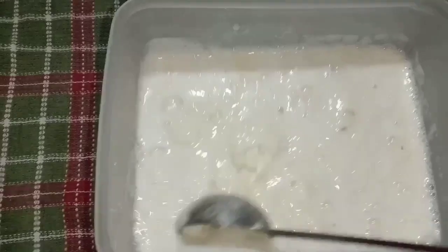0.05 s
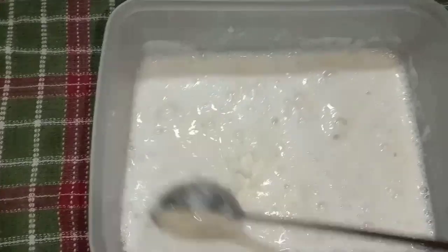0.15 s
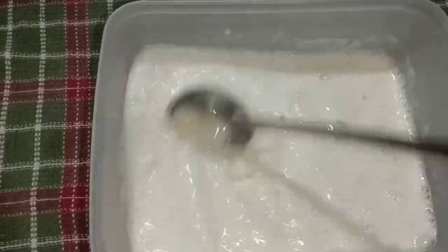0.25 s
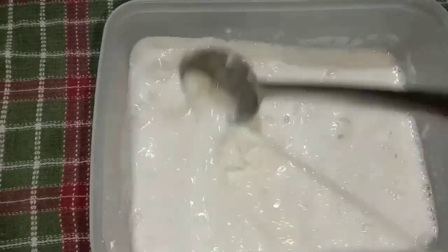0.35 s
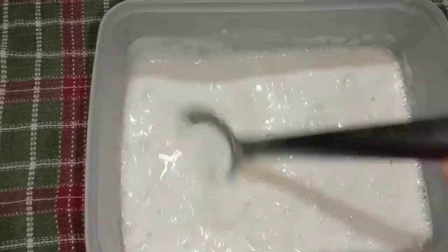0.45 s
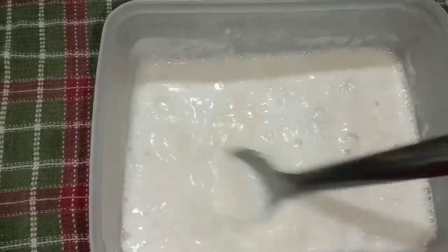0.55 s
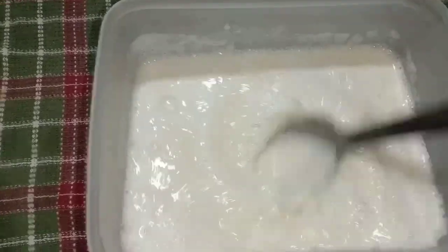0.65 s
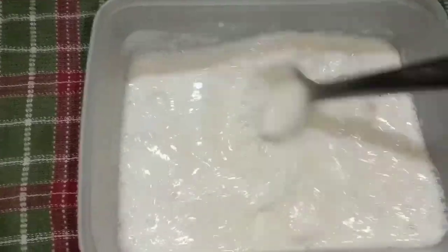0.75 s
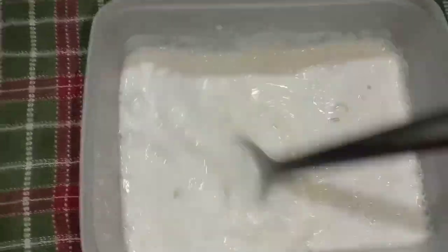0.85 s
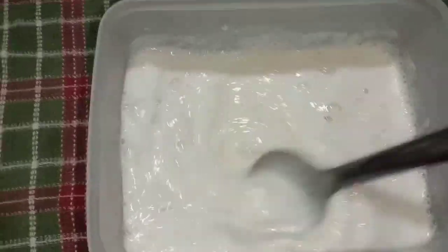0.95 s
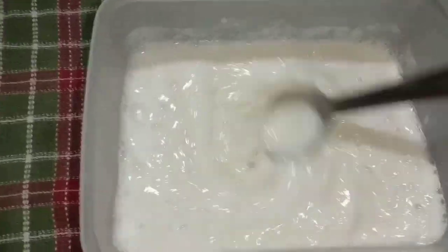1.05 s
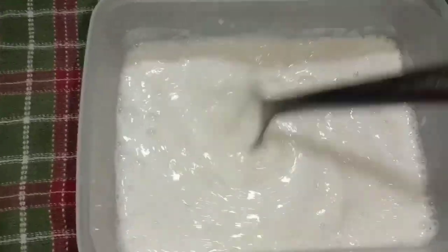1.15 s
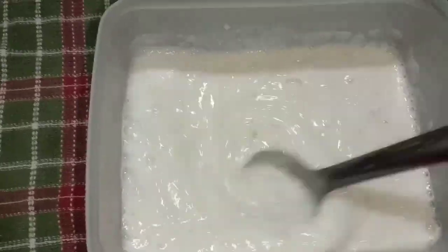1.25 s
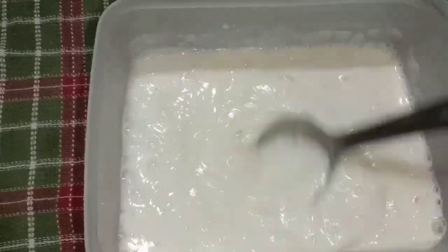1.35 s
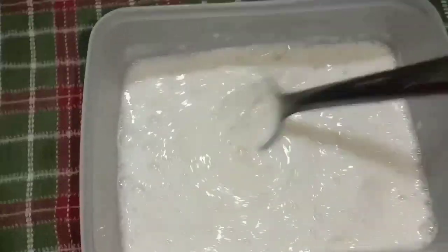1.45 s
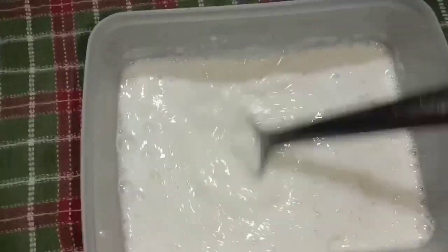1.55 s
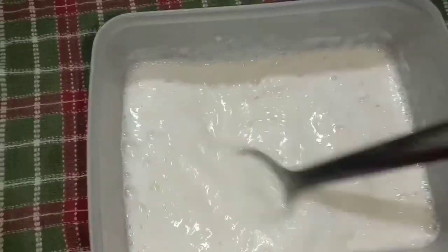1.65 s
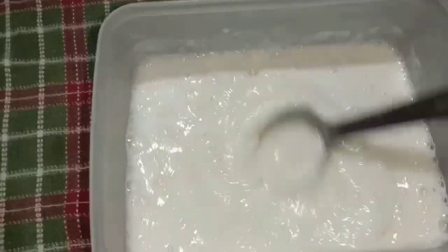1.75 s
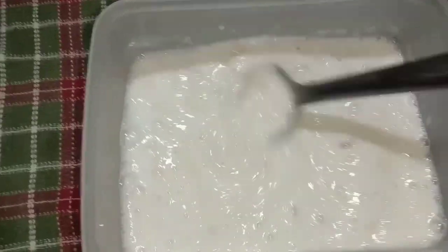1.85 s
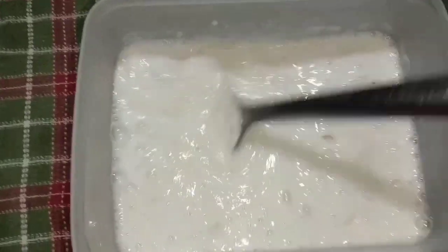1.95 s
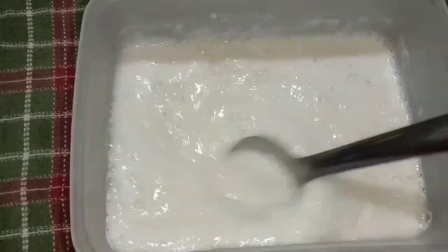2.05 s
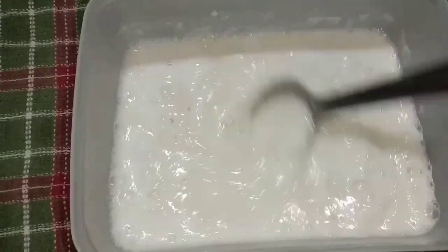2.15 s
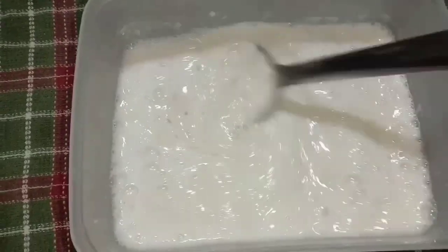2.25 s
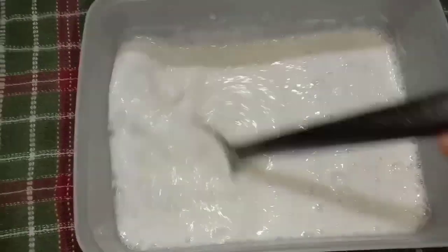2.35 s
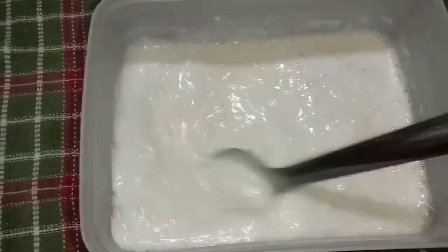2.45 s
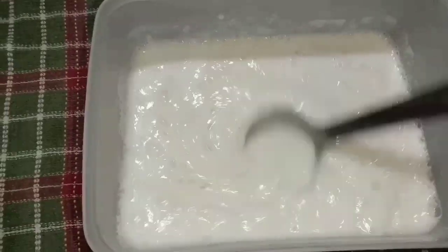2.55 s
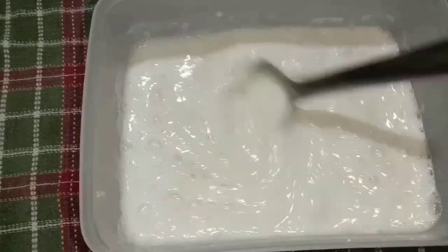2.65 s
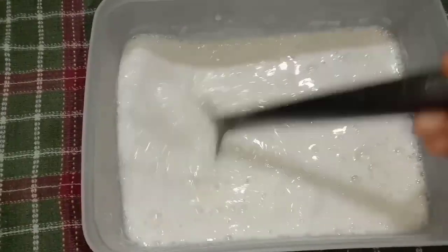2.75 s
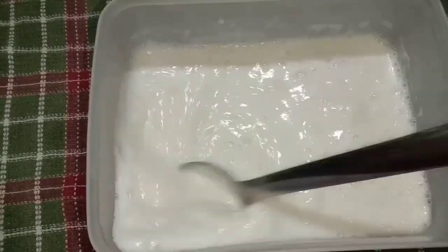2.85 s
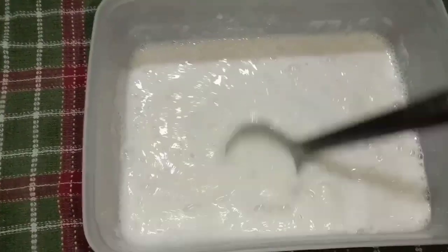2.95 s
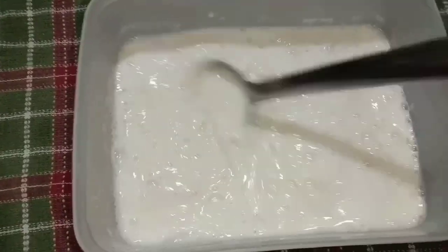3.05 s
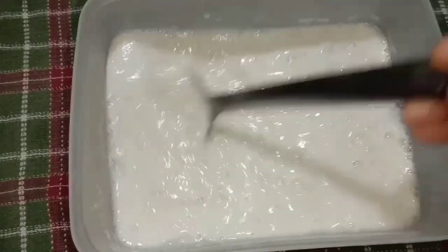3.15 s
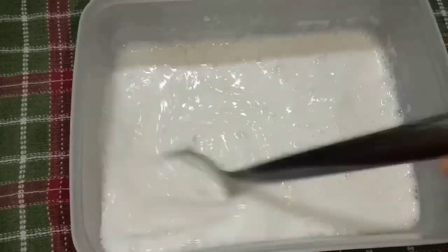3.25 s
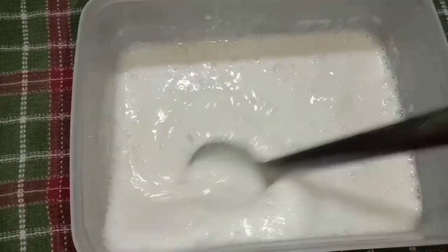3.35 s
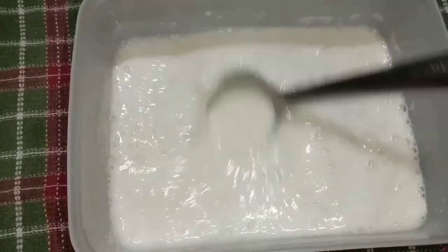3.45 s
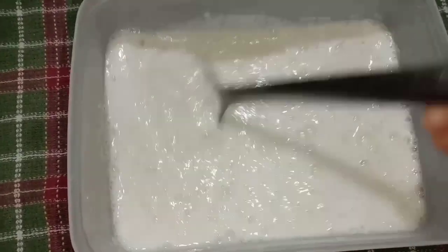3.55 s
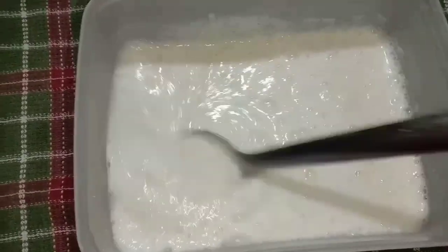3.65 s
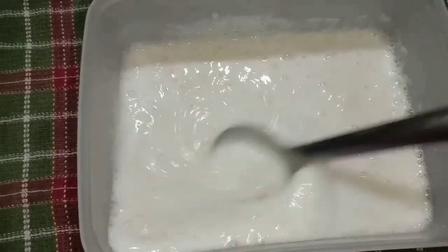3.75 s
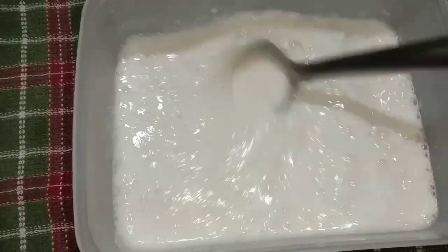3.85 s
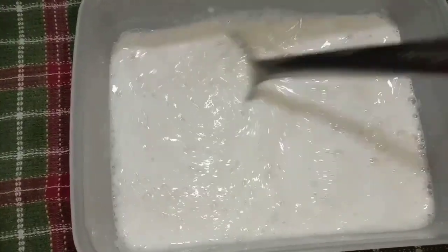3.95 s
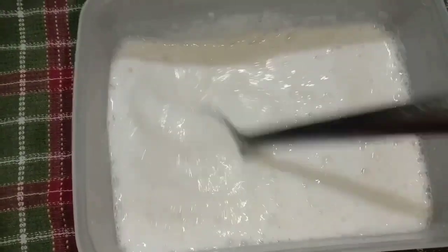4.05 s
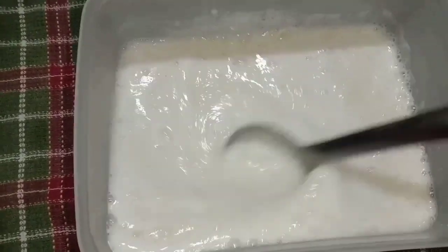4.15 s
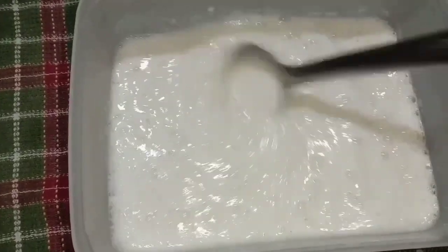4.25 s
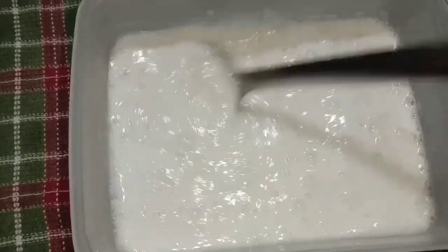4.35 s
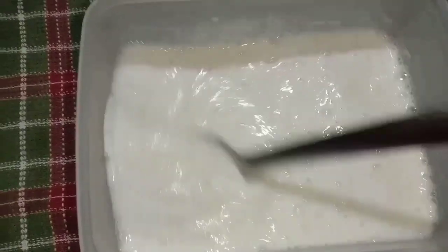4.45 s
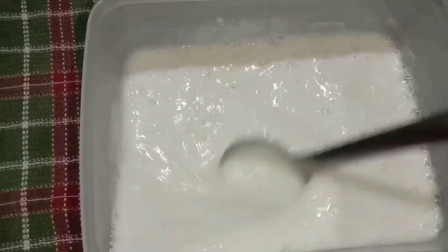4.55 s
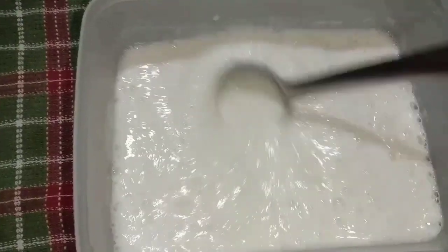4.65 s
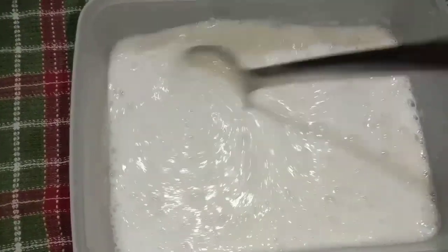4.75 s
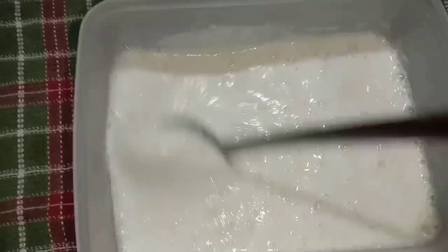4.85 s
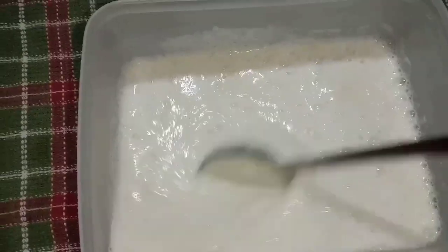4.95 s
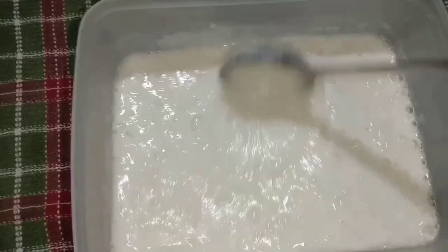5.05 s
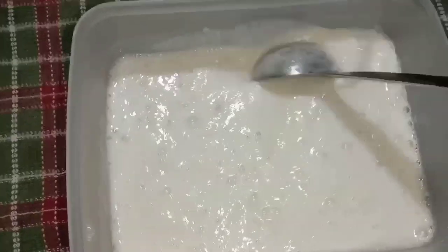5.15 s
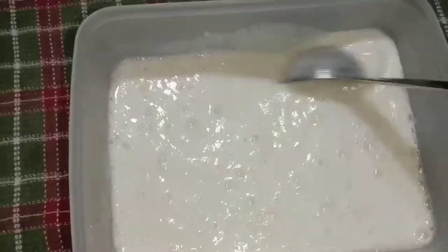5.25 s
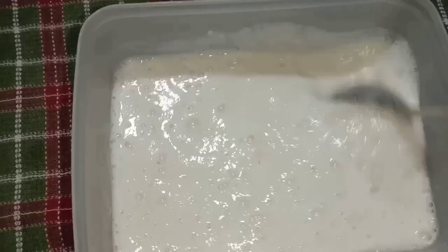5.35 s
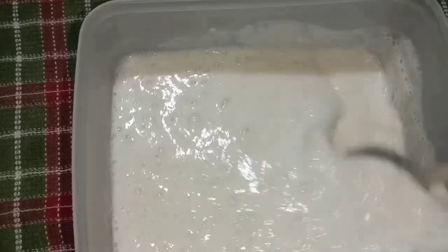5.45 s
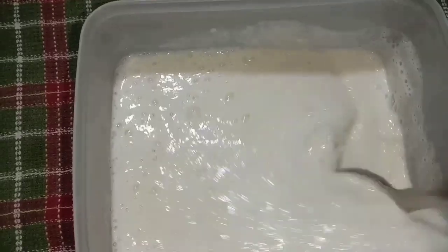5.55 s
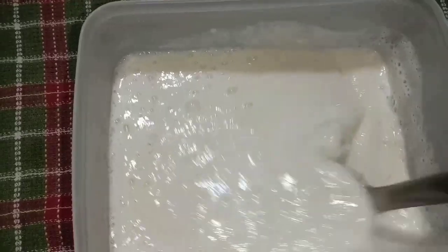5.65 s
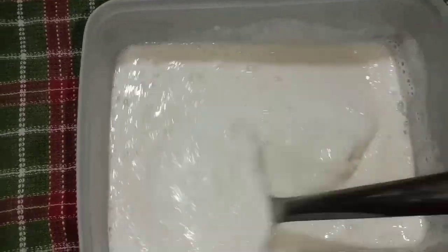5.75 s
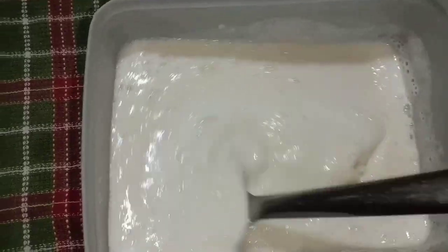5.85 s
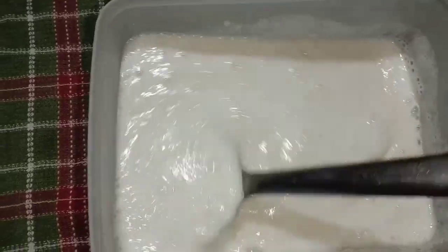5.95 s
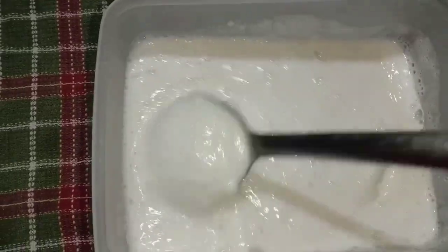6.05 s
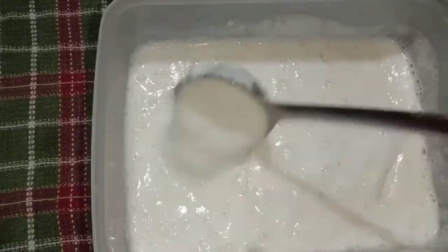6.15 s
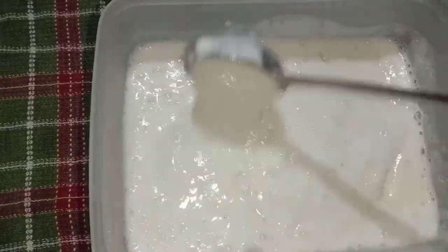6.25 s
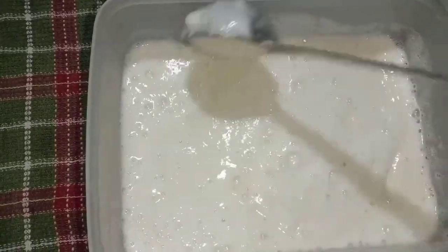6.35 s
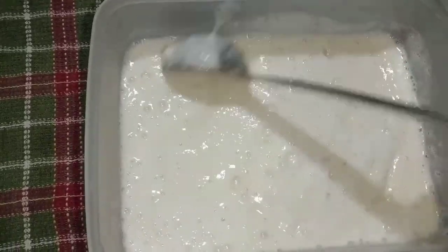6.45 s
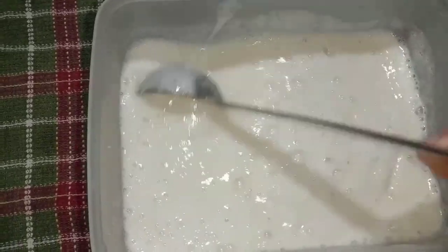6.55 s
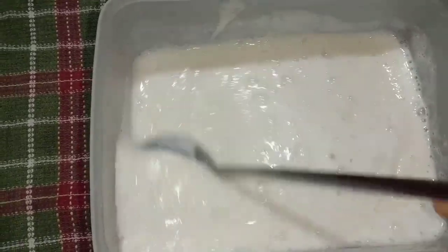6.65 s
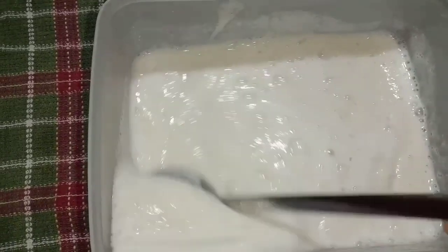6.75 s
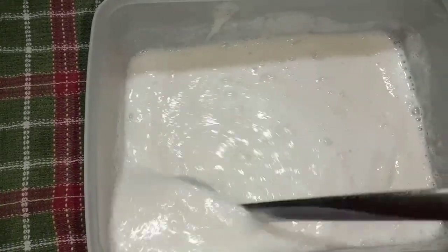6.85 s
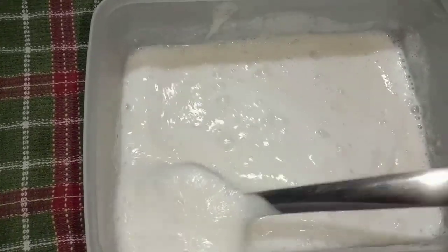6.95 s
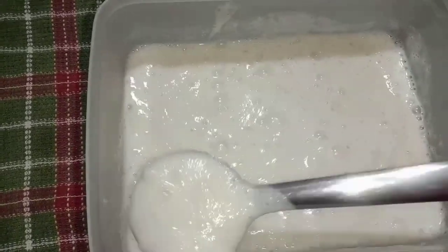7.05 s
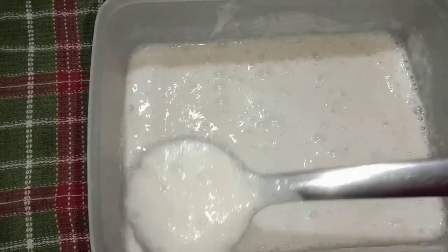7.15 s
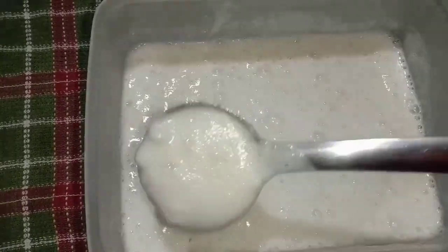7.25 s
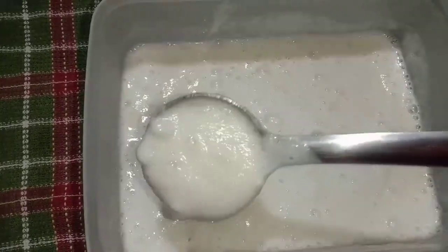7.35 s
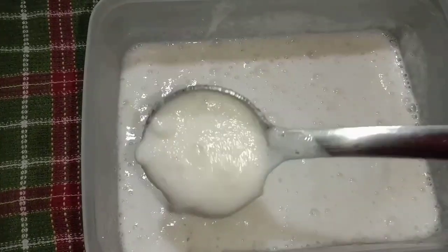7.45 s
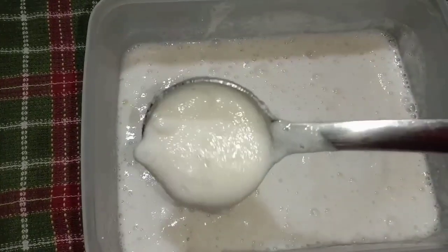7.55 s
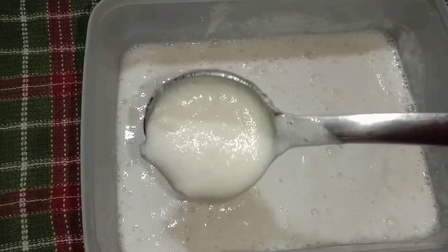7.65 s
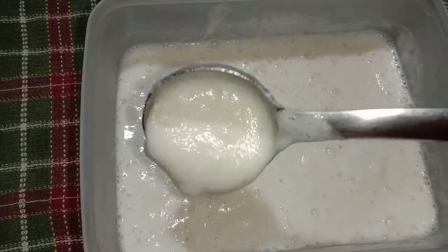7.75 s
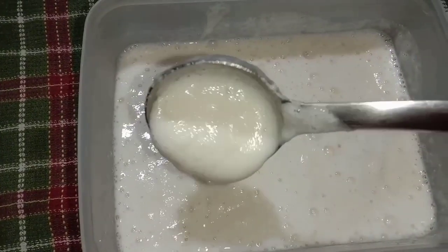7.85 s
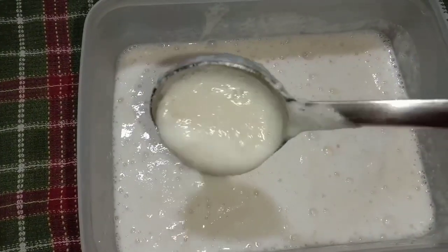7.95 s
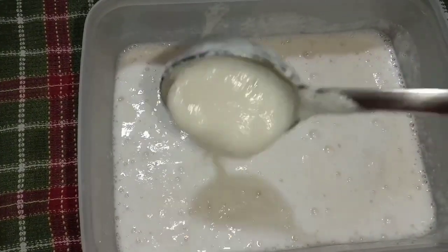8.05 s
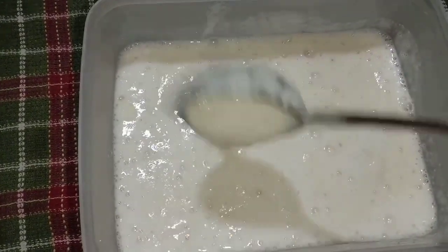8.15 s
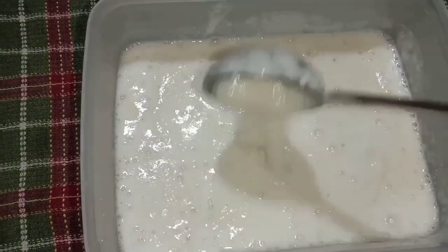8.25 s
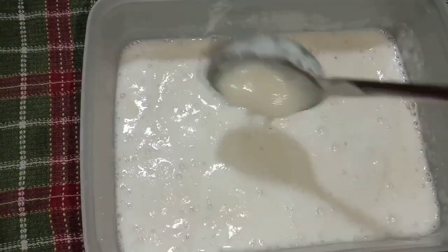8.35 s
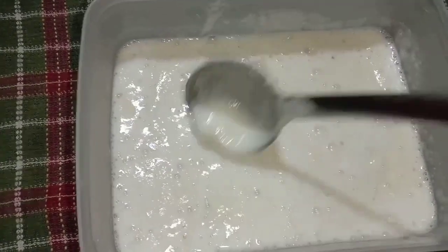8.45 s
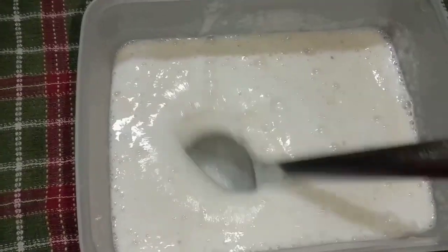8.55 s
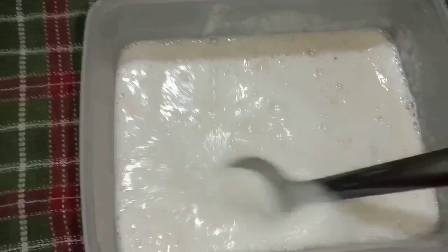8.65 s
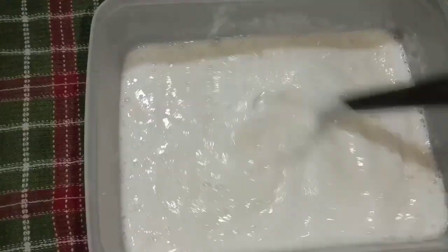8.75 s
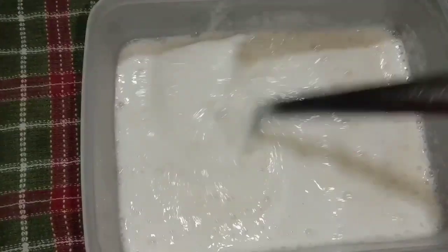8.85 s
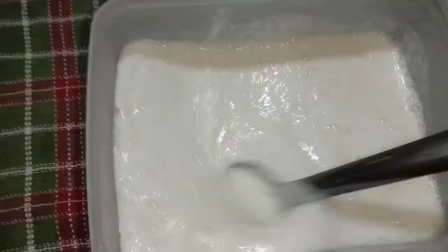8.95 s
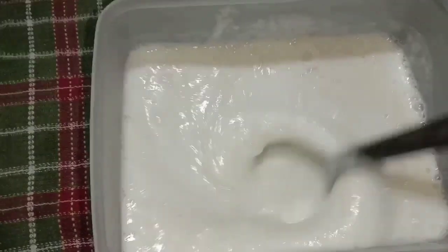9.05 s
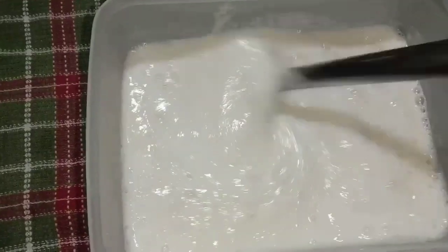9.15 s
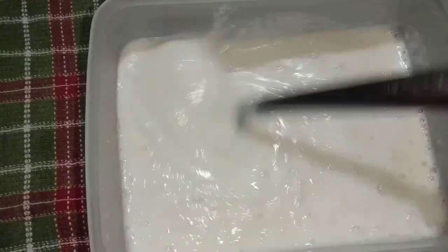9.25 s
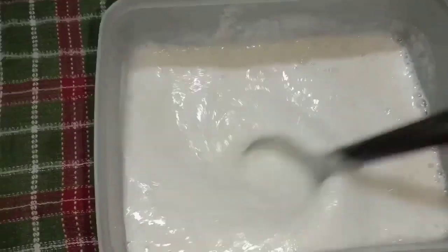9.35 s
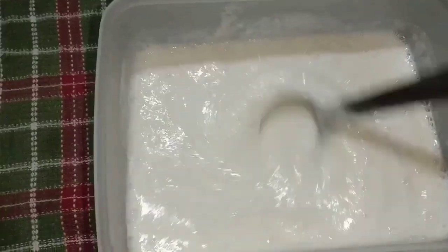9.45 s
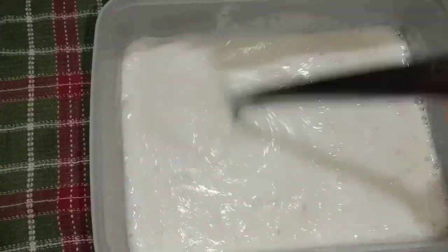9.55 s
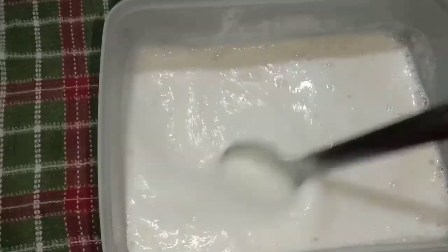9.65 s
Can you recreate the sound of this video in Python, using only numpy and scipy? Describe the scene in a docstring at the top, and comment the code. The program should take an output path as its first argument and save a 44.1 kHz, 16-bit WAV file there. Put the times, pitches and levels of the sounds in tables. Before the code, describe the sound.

A close, nearly centred microphone hears a metal spoon working thick batter in a plastic tub, over faint room tone and thin hiss. A wet squelch opens at 0 s, then from about 0.3 s strokes come several times a second: low gulps, sticky squelches, fine bubble crackle and soft bassy thumps as the mass rocks. Light knocks and tiny clinks accompany them, with one firmer knock at 2.65 s. Around 4.8 to 5.5 s knocks strengthen, and gritty scrapes along the wall carry a faint steely singing. More solid knocks fall near 6.1 and 6.6 s, with another scrape and a strong wet slurp around 6.3 s. From roughly 6.9 to 8.2 s stirring pauses; only faint wet movement remains and the hiss dips. At 8.3 s knocks and lively squelching return, strongest near 8.7 s, continuing until about 9.6 s. The room adds only a short, subtle wash.

```python
"""A wet squelch over faint room tone and hiss opens the scene: a metal spoon stirs thick batter in a plastic tub.
Filtered air-pocket tones gulp and squelch, clustered clicks crackle as foam, and a wandering tone heaves below.
Impulses with a dying chatter excite the tub's modes as knocks and clinks; dense grains scrape in two spells.
The stirring pauses and the hiss sinks before the last strokes. A short wash of the kitchen surrounds the tub."""
import sys
import numpy as np
from scipy import signal
from scipy.fft import rfft, irfft
from scipy.io import wavfile
from scipy.ndimage import uniform_filter1d

SR = 44100
rng = np.random.default_rng(int(sys.argv[2]) if len(sys.argv) > 2 else 0)


def output_pcm(signal):
    """Save a mono or channel-first signal as 16-bit PCM at the path in sys.argv[1].

    Samples are clipped to [-1, 1] before scaling.
    """
    pcm = np.clip(np.atleast_2d(signal).T, -1, 1) * 32767
    wavfile.write(sys.argv[1], SR, np.round(pcm).astype(np.int16))


N = 427769
TIME = np.arange(N) / SR  # s

# Spectra, one curve per sound, relative because each result is scaled: frequency_hz, density_db (per Hz)
ROOM_SPECTRUM = [(15, -38), (25, 13.5), (43, -6), (75, -12.5), (98, -7.5), (182, -12.5), (288, -34.5),
                 (352, -14), (642, -22), (753, -22), (1020, -26.5), (1270, -15.5), (1400, -24.5),
                 (1610, -23.5), (3000, -32.5), (3900, -66), (6600, -120)]
HISS_SPECTRUM = [(1760, -39), (3000, -10.5), (4440, -6), (5520, -6.5), (6000, 0), (6620, -8.5), (7460, 3.5),
                 (8280, -8), (9330, -11), (11400, -17), (13200, -19.5), (14900, -14.5), (16000, -9)]
SIDE_HISS_SPECTRUM = [(15, -39), (25, -12), (120, -3), (754, -2), (1260, -2.5), (5880, -12), (7920, -42),
                      (14800, -19), (16000, -48)]  # noise that differs between the two sides
SCRAPE_SPECTRUM = [(1060, -29), (1800, -4), (2120, 4), (2590, -6), (3410, -5), (3770, -9), (4210, -1.5),
                   (5590, -1.5), (6360, 2), (7420, 0), (8520, -10), (11100, -14), (12100, -24),
                   (15100, -16), (16000, -41)]
CRACKLE_SPECTRUM = [(1090, -23), (1850, -11.5), (2140, 2.5), (2460, -2), (2860, -3), (3100, 2), (3500, 0.5),
                    (4550, -32), (7700, -120)]
FIZZ_SPECTRUM = [(2060, -30), (3500, -2), (4160, -7), (4930, -3), (5460, -6.5), (5970, -4.5), (6650, -11),
                 (7370, -3), (8910, -20.5), (10400, -9), (11300, -3.5), (12700, -13), (15100, -11),
                 (16000, -64)]
SQUELCH_SPECTRUM = [(270, -36.5), (460, 2), (511, -24.5), (603, -5), (682, -10), (851, 2.5), (939, -2),
                    (1070, -8), (1260, 6), (1380, -2.5), (1520, -1.5), (1820, -2), (2000, -58), (2600, -66),
                    (4400, -120)]
GULP_SPECTRUM = [(71, -35), (120, 8.5), (166, -9.5), (208, -7.5), (258, -0.5), (322, -3), (349, 14.5),
                 (395, -2.5), (460, -18), (520, -10.5), (680, -34), (1140, -120)]
# Slow course of the hiss, added to HISS_DB: time_s, relative_level_db
HISS_COURSE = [(0, 1.5), (6.8, 1.5), (7.0, -5.5), (7.45, -1.5), (7.85, -6.5), (7.98, 0), (8.18, -14),
               (8.4, 1), (9.7, 1.5)]

# Modes of tub and spoon, listed by part from floor to tick: frequency_hz, relative_level_db, t60_s
TUB_MODES = { "floor": [(85.2, -4.5, 0.24), (103, -6, 0.094)], "walls": [(142, -2.5, 0.14), (196, 8, 0.088),
             (238, 1, 0.077)], "corner": [(261.4, -3.5, 0.095), (299, 0, 0.18), (356, -5.5, 0.24),
             (450, -4.5, 0.052)], "rim": [(546, -4.5, 0.054), (660, -15.5, 0.11), (857, -7, 0.066),
             (1130, 4, 0.0063), (1252, 5, 0.045), (1420, -8, 0.032), (1694, -10.5, 0.07)],
             "clack": [(2520, 0, 0.018), (2673, -4, 0.014), (2880, -3.5, 0.021), (3210, -2.5, 0.02)],
             "tick": [(3700, 0.5, 0.028), (4470, 5.5, 0.009), (5370, 0, 0.025), (5900, 6, 0.023),
             (6970, -10, 0.02), (7270, -3.5, 0.06)], }
# Dead thud of the contact in each part: centre_hz, width_hz, level_db (against the ring, before a trim), top_hz
THUD_BANDS = {"floor": (101.5, 44, -8, 152), "walls": (180, 88, 0.75, 550), "corner": (325, 278, 4.1, 770),
              "rim": (650, 890, 0.97, 1500), "clack": (2614, 1302, -7.5, 3800),
              "tick": (6000, 8994, -9.5, 14998)}
# How far the depth of a knock counts in each part; parts not listed ignore it: share (0 to 1)
DEPTH_SHARES = {"floor": 1, "walls": 0.31, "corner": 0.11}

# The rubbed steel spoon sings at one mode: start_s, length_s, relative_level_db
SONG_GESTURES = [(4.52, 0.15, -45.5), (5.289, 0.059, -40), (5.45, .08, -38), (6.282, .2, -52),
                 (6.674, 0.043, -41.5), (6.92, 0.036, -62), (7.25, .05, -53.5)]
# The spoon's edge drags along the wall: start_s, length_s, relative_level_db
SCRAPE_GESTURES = [(5.02, 0.063, -44.5), (5.102, 0.12, -38), (5.296, 0.23, -41.5), (6.25, 0.24, -36.5)]
# Bare steel clinks on the tub: start_s, tick_level_db, clack_level_db (both before a common trim)
CLINK_EVENTS = [(1.6237, -44, -60), (2.021, -47, -64), (2.357, -65, -44.5), (2.4234, -50, -45.5),
                (2.65, -44.5, -30.5), (3.675, -50.5, -55), (4.608, -40, -49), (4.929, -37.5, -49),
                (5.293, -45.5, -50), (5.3975, -69, -72), (6.466, -42, -57), (6.4927, -58, -66),
                (6.541, -41, -48), (8.2318, -46.5, -63), (8.319, -58, -39.5), (8.488, -48, -45),
                (8.72, -37.5, -49)]
# The spoon knocks on the tub: start_s, relative_level_db, contact_ms (sets the balance of the parts),
# depth_db (how strongly the floor is hit)
KNOCK_EVENTS = [(0.295, -41.5, 0.28, -23), (1.053, -36.5, 1.5, -30), (1.118, -39.5, 1.8, -34),
                (1.392, -46.5, 0.28, 1), (1.567, -36.5, 2.6, -5), (1.6235, -40, 0.52, -34),
                (2.173, -38.5, 0.39, -22), (2.357, -47, 0.28, 6), (2.4233, -49.5, 0.096, -14),
                (2.65, -21, .5, -1.5), (3.627, -41, 0.48, -5), (4.035, -37, 1.6, -2),
                (4.848, -27.5, 1.6, 1), (4.929, -24.5, 0.34, 2.5), (5.059, -31, 0.88, 8),
                (5.293, -24.5, 1.15, -23), (6.061, -18.5, 1.84, -18), (6.105, -34, 1.33, -7),
                (6.2548, -35, 0.087, -7.5), (6.57, -21, 1.8, -14), (8.025, -60.5, 0.15, -27),
                (8.319, -31, 0.55, -4.5), (8.488, -26.5, 1.28, -14), (8.7197, -21, 0.77, 2.5),
                (8.832, -32.5, 3, 5), (8.859, -40.5, .3, -3), (9.025, -36.5, 0.58, -5),
                (9.179, -35.5, 1.2, 1), (9.213, -42.5, 0.84, 4.5), (9.233, -34, 1.19, -15),
                (9.312, -40, 0.97, -3), (9.579, -46, .25, -74)]
# The mass of batter rocks the tub's floor: start_s, length_s, pitch_hz (before wander), relative_level_db
HEAVE_GESTURES = [(0.296, 0.14, 87.3, -37.5), (0.666, 0.048, 88.2, -37), (0.772, 0.028, 88, -51),
                  (0.895, 0.047, 92.6, -50), (0.966, 0.075, 100.4, -44), (1.213, 0.055, 87.3, -37.5),
                  (1.318, 0.07, 102.7, -29.5), (1.4, 0.058, 101.3, -35), (1.763, 0.08, 98.9, -35),
                  (1.875, 0.03, 99.6, -37), (1.975, 0.028, 95.5, -32.5), (2.117, 0.065, 93.5, -38),
                  (2.402, 0.12, 98.9, -37.8), (2.774, 0.054, 97.2, -39), (2.867, 0.067, 101.4, -25.5),
                  (3.25, 0.05, 99, -38.5), (3.417, 0.08, 84.86, -32), (3.506, 0.035, 89.6, -41.4),
                  (3.666, 0.069, 112.3, -38.5), (3.775, 0.03, 105, -40.5), (3.868, 0.045, 92, -38),
                  (4.049, 0.036, 89.2, -40.8), (4.271, 0.04, 87, -41), (4.4, 0.06, 90.5, -42.5),
                  (5.177, 0.1, 97, -37.5), (5.476, 0.067, 91, -43.5), (5.652, 0.06, 98.2, -24),
                  (5.846, 0.082, 98, -42), (5.952, 0.04, 109, -45), (6.282, 0.17, 95.4, -64),
                  (8.334, 0.089, 92.7, -52), (8.856, 0.065, 86, -29.5), (9.08, 0.056, 84.8, -46),
                  (9.199, 0.09, 90.6, -35.5), (9.35, 0.084, 98, -54)]
# Hollows open or close in the batter: middle_s, length_s, pitch_hz (at the middle), relative_level_db
SLURP_EVENTS = [(0.009, 0.025, 1320, -36), (0.493, 0.12, 2200, -51.5), (0.824, 0.076, 2700, -44.5),
                (0.96, 0.058, 363, -35.5), (1.179, 0.092, 2030, -47.5), (1.403, 0.094, 586, -45.5),
                (1.546, 0.066, 334, -45.5), (1.567, 0.035, 2030, -48), (1.81, 0.079, 202, -43),
                (1.905, .05, 200, -45), (1.928, 0.056, 740, -48), (2.267, 0.09, 5740, -43),
                (2.364, 0.045, 2720, -50), (2.39, 0.042, 189.3, -48), (2.53, 0.056, 231, -55),
                (2.946, 0.073, 1450, -42.5), (3.254, 0.097, 4180, -47.5), (3.429, 0.092, 1302, -42),
                (3.43, 0.098, 334.4, -43), (3.48, 0.14, 4560, -47), (3.74, 0.072, 176, -46),
                (3.947, 0.085, 4600, -43.5), (4.21, .17, 1450, -51), (4.312, 0.11, 4600, -48.5),
                (5.67, 0.096, 162, -46), (5.98, 0.0493, 172, -50), (6.35, 0.066, 293, -33.5),
                (6.354, .09, 1300, -37), (6.715, 0.052, 1290, -45.5), (6.831, 0.05, 1250, -51),
                (7.093, 0.15, 486, -58), (7.226, 0.13, 3940, -58.5), (7.55, 0.16, 4150, -58),
                (7.871, 0.19, 4020, -58), (7.89, 0.071, 351, -49), (8.38, 0.044, 322, -51),
                (9.0, 0.11, 1400, -43)]
# Strokes through the batter: start_s, length_s, gulp_db, squelch_db, foam_db (relative levels)
STIR_STROKES = [(0.0, 0.006, -40, -44, -41), (0.268, 0.24, -46, -50, -51), (0.517, 0.24, -44.5, -47, -48.5),
                (0.781, 0.15, -43.5, -50, -50), (0.973, 0.12, -46.5, -47.5, -50),
                (1.118, 0.089, -41, -51.5, -53.5), (1.315, 0.12, -41, -51, -72),
                (1.52, 0.14, -40.5, -55, -57.5), (1.723, .13, -48, -48.5, -59.5),
                (1.913, .12, -37.5, -46.5, -49), (2.108, 0.25, -44.5, -48.5, -49.5),
                (2.424, .14, -42.5, -51, -55), (2.67, 0.2, -39.5, -55, -51.5),
                (2.915, 0.087, -45.5, -48.5, -50.5), (3.14, 0.13, -49, -53, -49),
                (3.385, 0.11, -42, -48, -48), (3.508, 0.088, -47, -55, -52.5),
                (3.602, 0.068, -42, -47, -63), (3.81, 0.24, -46.5, -50, -53),
                (4.171, 0.33, -48, -53, -51.5), (4.56, .11, -52.5, -54.5, -50),
                (4.997, 0.21, -45, -48, -46.5), (5.14, 0.094, -38, -41.5, -55), (5.32, 0.22, -46, -48, -56),
                (5.421, 0.12, -37, -38.5, -51), (6.087, 0.078, -48, -44, -49.5),
                (6.271, 0.2, -38, -36, -40), (6.667, .14, -57.5, -51, -48.5),
                (8.346, 0.23, -37.5, -45.5, -46.5), (8.586, 0.059, -44, -40, -48.5),
                (8.645, 0.066, -33, -38, -42.5), (8.769, 0.11, -41, -43.5, -47),
                (8.946, 0.11, -40, -40.5, -47.5), (9.083, 0.06, -64, -51, -49.5),
                (9.16, 0.15, -49, -47, -66), (9.35, 0.11, -38, -42.5, -46.5)]
# The batter goes on settling between strokes: time_s, relative_level_db
SETTLING_COURSE = [(0, -64), (0.25, -69), (0.35, -59.5), (4.4, -54.5), (4.75, -59.5), (5.6, -65),
                   (6.8, -66), (7.5, -65.5), (8.2, -64.5), (8.4, -58.5), (9.45, -44), (9.65, -71.5)]

ROOM_TONE_DB, HISS_DB = -57.5, -59.5
KITCHEN_T60_S, KITCHEN_DB = 0.18, -13.5
CUTOFF_HZ = 15700
SONG_ATTACK_S, SONG_T60_S = 0.014, 0.098
SCRAPE_ATTACK_S, SCRAPE_T60_S = 0.023, 0.28
HEAVE_ATTACK_S, HEAVE_T60_S = 0.018, 0.1
STROKE_ATTACK_S, STROKE_T60_S = 0.016, 0.16
SLURP_WIDTH_SHARE, SLURP_SAG_SHARE = 0.2, 0.044  # of the hollow's pitch


def from_db(db):
    """Logarithmic levels: decibels become amplitude gain."""
    return 10 ** (np.asarray(db) / 20)


def rms_one(x):
    """Normalisation: scale to an rms of 1."""
    return x / np.sqrt(np.mean(x ** 2) + 1e-20)


def course(rows):
    """Linear interpolation: a two-column curve read at every sample."""
    s, values = np.transpose(rows)
    return np.interp(TIME, s, values)


def drift(rate):
    """Band-limited chance: random knots, rate per second, joined by lines; rms 1."""
    knots = np.arange(0, TIME[-1] + 1, 1 / rate)
    return rms_one(np.interp(TIME, knots, rng.standard_normal(len(knots))))


def stutter(depth_db, rate):
    """Stick and slip: a gain in uneven bursts, as something sticks and lets go; rms 1."""
    wander = (drift(rate) + drift(rate * np.e)) / np.sqrt(2)
    return rms_one(from_db(depth_db * wander))


def steady(x, seconds):
    """Automatic gain: hold the level constant over stretches of this length, keeping the finer grain."""
    size = max(2, int(seconds * SR))
    power = uniform_filter1d(uniform_filter1d(x * x, size), size)
    return x / np.sqrt(np.abs(power) + 1e-6)


def swells(starts, lengths, levels_db, attack_s, t60_s):
    """Envelope: each gesture rises, holds and dies exponentially; overlapping gestures add in power."""
    power = np.zeros(N + SR)
    t = TIME[:SR]
    for s, length, db in zip(starts, lengths, levels_db):
        start = max(0, int(s * SR))
        decay_db = 60 * np.maximum(t - length, 0) / t60_s
        shape = np.minimum(t / attack_s, 1) * from_db(db - decay_db)
        power[start:start + SR] += shape ** 2
    return np.sqrt(power[:N])


def resonance(x, hz, width_hz):
    """Damped oscillator: a two-pole band-pass with gain 1 on top."""
    r = np.exp(-np.pi * width_hz / SR)
    zeros = np.array([1, 0, -1]) * (1 - r * r) / 2
    poles = [1, -2 * r * np.cos(2 * np.pi * hz / SR), r * r]
    return signal.lfilter(zeros, poles, x + 1e-18)


def gliding(x, hz, width_hz):
    """Moving resonance: shift to zero, low-pass twice for steep flanks, shift back; rms 1."""
    turn = np.exp(2j * np.pi * np.cumsum(hz) / SR)
    r = np.exp(-np.pi * width_hz / SR)
    low = signal.lfilter([1 - r], [1, -2 * r, r * r], x / turn + 1e-18)
    return rms_one(np.real(turn * low))


def colour(x, spectrum, size=4096):
    """Minimum phase: a causal filter follows a spectrum and falls steeply outside it; rms 1."""
    hz, db = np.transpose(spectrum)
    octave = np.log2(np.arange(size // 2 + 1) * SR / size + 1)
    points = np.log2(hz)
    outside = np.abs(octave - np.clip(octave, points[0], points[-1]))
    shape_db = np.interp(octave, points, db) - 40 * np.minimum(outside, 1)
    # Folding the cepstrum onto positive time makes the filter causal
    cepstrum = irfft(np.log(from_db(shape_db)))
    cepstrum[1:size // 2] *= 2
    cepstrum[size // 2 + 1:] = 0
    impulse = irfft(np.exp(rfft(cepstrum)))
    return rms_one(signal.fftconvolve(x, impulse)[:N])


def grains(per_s, spread_db):
    """Poisson-like impulses: clicks at random moments, many small and a few large."""
    sizes = from_db(spread_db * np.minimum(rng.exponential(1, N), 4))
    signs = rng.choice([-1, 1], N)
    return sizes * signs * (rng.random(N) < per_s / SR)


def cavities(x, low_hz, high_hz, depth_db, rate, count):
    """Cavity resonance: small hollows open and shut, each lifting its own band for a moment; rms 1."""
    centres = np.geomspace(low_hz, high_hz, count)
    total = 0
    for k, (hz, width) in enumerate(zip(centres, np.gradient(centres))):
        gain = from_db(depth_db * drift(rate))
        total = total + (-1) ** k * gain * resonance(x, hz, width / 2)
    return rms_one(total)


def pockets(low_hz, high_hz, cycles, glide, spread_db, count):
    """Bubble resonance: air pockets ring a few cycles, the pitch sliding as the shape changes; rms 1."""
    out = np.zeros(N + SR)
    for when, pitch, size, slide in rng.random((count, 4)):
        hz = low_hz * (high_hz / low_hz) ** pitch
        age = np.linspace(0, 1, int(cycles / hz * SR))
        phase = 2 * np.pi * cycles * (age + glide * (2 * slide - .5) * age ** 2)
        level = from_db(-spread_db * np.log(size + .02) - 60 * age)
        start = int(when * N)
        out[start:start + len(age)] += level * np.sin(phase)
    return rms_one(out[:N])


def ring(part, t, strengths_db):
    """Modal decay: the modes of one part after a blow; neighbours start in opposite directions."""
    total = 0
    for k, (hz, db, t60) in enumerate(TUB_MODES[part]):
        level = from_db(db + strengths_db[k] - 60 * t / t60)
        total = total + (-1) ** k * level * np.sin(2 * np.pi * hz * t)
    return total


def through_tub(x, part):
    """Convolution: a force sets one part of the tub ringing; rms 1."""
    response = ring(part, TIME[:SR // 2], np.zeros(len(TUB_MODES[part])))
    return rms_one(signal.fftconvolve(x, response)[:N])


def contact(chatter_db, chatter_s):
    """Impulsive contact: a one-sample push, then an exponentially dying chatter of small touches."""
    t = TIME[:SR // 4]
    touches = rng.standard_normal(len(t)) * (rng.random(len(t)) < .05)
    force = from_db(chatter_db) * touches * np.exp(-t / chatter_s)
    force[0] = 1
    return force


def blow(force, part, vary_db, dead_db):
    """Forced vibration: one part's dead thud and ring, with the energy of 50 ms at rms 1."""
    t = TIME[:len(force)]
    hz, width_hz, thud_db, top_hz = THUD_BANDS[part]
    thud = resonance(resonance(force, hz, width_hz), hz, width_hz)
    response = ring(part, t, vary_db * rng.standard_normal(len(TUB_MODES[part])))
    rung = signal.fftconvolve(force, response)[:len(t)]
    both = rms_one(rung) + from_db(thud_db + dead_db) * rms_one(thud)
    soften = signal.butter(3, min(top_hz, .45 * SR), fs=SR, output="sos")
    return np.sqrt(.05 / t[-1]) * rms_one(signal.sosfilt(soften, both))


def stirring(voice, settling_db):
    """Level of one voice of the batter: it swells with each stroke and murmurs on as the batter settles."""
    rows = np.transpose(STIR_STROKES)
    levels_db = rows[2 + ("gulp", "squelch", "foam").index(voice)]
    stroke = swells(rows[0], rows[1], levels_db, STROKE_ATTACK_S, STROKE_T60_S)
    return np.hypot(stroke, from_db(course(SETTLING_COURSE) + settling_db))


def background():
    """Stationary noise: the still room, and a thin hiss that sinks in the pause."""
    room = from_db(ROOM_TONE_DB) * colour(rng.standard_normal(N), ROOM_SPECTRUM)
    hiss_level = from_db(HISS_DB + course(HISS_COURSE))
    return room + hiss_level * colour(rng.standard_normal(N), HISS_SPECTRUM)


def kitchen(x, wall_cut_hz):
    """Reverberation: decaying, low-passed noise stands for the short wash from the walls."""
    t = TIME[:SR // 2]
    decay = from_db(-60 * t / KITCHEN_T60_S)
    tail = rng.standard_normal(len(t)) * decay * (t > .006)  # reflections start after 6 ms
    low_pass = signal.butter(1, min(wall_cut_hz, SR / 3), fs=SR, output="sos")
    tail = signal.sosfilt(low_pass, tail)
    return signal.fftconvolve(x, tail / np.sqrt(np.sum(tail ** 2)))[:N]


def spoon_song(hz, width_hz, level_db):
    """Sustained excitation: rubbing keeps one narrow mode of the steel sounding."""
    level = from_db(level_db) * swells(*np.transpose(SONG_GESTURES), SONG_ATTACK_S, SONG_T60_S)
    return level * gliding(rng.standard_normal(N), np.full(N, hz), width_hz)


def scrape(level_db, ring_db):
    """Stick-slip friction: the edge slips thousands of times a second on the plastic, in gritty clusters."""
    slips = grains(per_s=4500 * from_db(4 * drift(160)), spread_db=3.4)
    rasp = colour(slips, SCRAPE_SPECTRUM) + from_db(ring_db) * through_tub(slips, "clack")
    level = swells(*np.transpose(SCRAPE_GESTURES), SCRAPE_ATTACK_S, SCRAPE_T60_S)
    return from_db(level_db) * level * steady(rasp, seconds=0.12)


def clinks(level_db, dead_db, vary_db, chatter_db, chatter_s):
    """Hard impact: bare steel grazes the tub and rings only in the highest modes."""
    out = np.zeros(N + SR)
    for s, tick_db, clack_db in CLINK_EVENTS:
        force, start = contact(chatter_db, chatter_s), int(s * SR)
        tick = from_db(tick_db) * blow(force, "tick", vary_db, dead_db)
        clack = from_db(clack_db) * blow(force, "clack", vary_db, dead_db)
        out[start:start + len(force)] += from_db(level_db) * (tick + clack)
    return out[:N]


def knocks(part_db, vary_db, chatter_db, chatter_s, firm_db, softening, steepness, dead_db):
    """Impact spectrum: long contact leaves the high parts still; a gentle, cushioned blow chatters more."""
    out = np.zeros(N + SR)
    for s, db, contact_ms, depth_db in KNOCK_EVENTS:
        gentleness_db = np.clip(firm_db - db, 0, 18)
        force = contact(chatter_db + softening * gentleness_db, chatter_s)
        start = int(s * SR)
        for part, trim_db in zip(TUB_MODES, part_db):
            mean_hz = np.mean([hz for hz, _, _ in TUB_MODES[part]])
            cycles = contact_ms / 1000 * mean_hz  # of the part's vibration within the contact
            level = from_db(db + trim_db + DEPTH_SHARES.get(part, 0) * depth_db)
            gain = level / np.sqrt(1 + cycles ** steepness)
            out[start:start + len(force)] += gain * blow(force, part, vary_db, dead_db)
    return out[:N]


def heave(level_db, ring_db, wander_hz, stir_db):
    """Mass on a spring: the loaded floor swings at a wandering pitch; uneven tugs add its lowest modes."""
    s, length, hz, db = np.transpose(HEAVE_GESTURES)
    pitch_hz = np.interp(TIME, s + length / 2, hz) + wander_hz * drift(25)
    swing = np.sqrt(2) * np.sin(2 * np.pi * np.cumsum(pitch_hz) / SR)
    tugs = through_tub(grains(per_s=620, spread_db=5.5), "floor")
    tugged = rms_one(resonance(tugs, hz=96, width_hz=100))
    push = swells(s, length, db + level_db, HEAVE_ATTACK_S, HEAVE_T60_S)
    level = np.hypot(push, from_db(stir_db) * stirring("gulp", settling_db=9))
    return level * steady(swing + from_db(ring_db) * tugged, seconds=0.02)


def foam(crackle_db, fizz_db):
    """Film rupture: bubble films snap in clusters, coloured by the changing cavities around them."""
    level = stirring("foam", settling_db=-2.0) * stutter(depth_db=2.0, rate=18)
    snaps = rms_one(grains(per_s=2600 * from_db(5 * drift(90)), spread_db=3.8))
    crackle = cavities(snaps, low_hz=1898, high_hz=3435, depth_db=2.5, rate=26, count=7)
    crackle = steady(colour(crackle, CRACKLE_SPECTRUM), seconds=0.42)
    fizz = cavities(snaps, low_hz=3604, high_hz=8280, depth_db=4, rate=22, count=13)
    fizz = steady(colour(fizz + from_db(-11) * snaps, FIZZ_SPECTRUM), seconds=0.076)
    return level * (from_db(crackle_db) * crackle + from_db(fizz_db) * fizz)


def slurps(level_db, snaps_per_s):
    """Cavity resonance: tearing batter excites a hollow whose pitch sags as it swells and closes."""
    out = np.zeros(N + SR)
    for s, length, hz, db in SLURP_EVENTS:
        n, start = int(length * SR), max(0, int((s - length / 2) * SR))
        snaps = rng.standard_normal(n) * (rng.random(n) < snaps_per_s / SR)
        pitch_hz = hz * (1 + SLURP_SAG_SHARE * np.linspace(.5, -.5, n))
        hollow = gliding(snaps, pitch_hz, SLURP_WIDTH_SHARE * hz)
        opening = np.sin(np.linspace(0, np.pi, n))
        out[start:start + n] += from_db(db + level_db) * opening * hollow
    return out[:N]


def folding(gulp_db, squelch_db, walls_db, corner_db, rim_db):
    """Bubble size sets pitch: large pockets gulp, small ones squelch, and sticky tugs make the tub ring."""
    gulp_level = stirring("gulp", settling_db=2.5) * stutter(depth_db=2.75, rate=22)
    squelch_level = stirring("squelch", settling_db=-3) * stutter(depth_db=3.1, rate=34)

    tugs = grains(per_s=320, spread_db=4.5)
    large = pockets(low_hz=130, high_hz=480, cycles=16, glide=.2, spread_db=4, count=900)
    gulps = colour(large, GULP_SPECTRUM)
    gulps = gulps + from_db(walls_db) * through_tub(tugs, "walls")
    gulps = gulps + from_db(corner_db) * through_tub(tugs, "corner")

    small = pockets(low_hz=509, high_hz=2170, cycles=17.5, glide=0.062, spread_db=5.5, count=9000)
    small = cavities(small, low_hz=481.6, high_hz=1843, depth_db=3.0, rate=22, count=12)
    squelch = colour(small, SQUELCH_SPECTRUM)
    squelch = squelch + from_db(rim_db) * through_tub(grains(per_s=550, spread_db=9.5), "rim")

    return (from_db(gulp_db) * gulp_level * steady(gulps, seconds=0.061)
            + from_db(squelch_db) * squelch_level * steady(squelch, seconds=0.02))


def scene():
    """Superposition: the tub sits straight ahead; only a trace of room and hiss differs between the sides."""
    rubbing = scrape(level_db=-0.8, ring_db=-24) + spoon_song(hz=6410, width_hz=160, level_db=-3.0)
    # part_db follows the order of the parts, floor to tick
    struck = (clinks(level_db=-0.6, dead_db=4, vary_db=6, chatter_db=-7.5, chatter_s=0.005)
              + knocks(part_db=(1, 0.0, -2.0, -3.5, -7.5, -1.5), vary_db=4, chatter_db=-22,
                       chatter_s=0.0063, firm_db=-20.0, softening=0.77, steepness=4.37, dead_db=2.0))
    heaving = heave(level_db=0.5, ring_db=-3.5, wander_hz=6.3, stir_db=-9.5)
    wet = (foam(crackle_db=-3.5, fizz_db=0.32)
           + slurps(level_db=-2.0, snaps_per_s=5100)
           + folding(gulp_db=-1.0, squelch_db=-2.0, walls_db=2.0, corner_db=-1.0, rim_db=-3.5))
    tub = (struck + heaving
           + wet * stutter(depth_db=0.27, rate=45)
           + rubbing * stutter(depth_db=3.0, rate=36))
    mid = tub + from_db(KITCHEN_DB) * kitchen(tub, wall_cut_hz=20700) + background()
    side = from_db(-53) * kitchen(tub, wall_cut_hz=670)
    side = signal.sosfilt(signal.butter(3, 330, "high", fs=SR, output="sos"), side)
    side = side + from_db(-69.5) * colour(rng.standard_normal(N), SIDE_HISS_SPECTRUM)
    return np.array([mid + side, mid - side])


def record(dry):
    """Band limiting: the microphone sheds the lowest rumble and the top is cut steeply."""
    thinned = signal.sosfilt(signal.butter(3, 54, "high", fs=SR, output="sos"), dry)
    return signal.sosfilt(signal.ellip(10, .1, 80, CUTOFF_HZ, fs=SR, output="sos"), thinned)


dry = scene()
out = record(dry)
output_pcm(out)
```